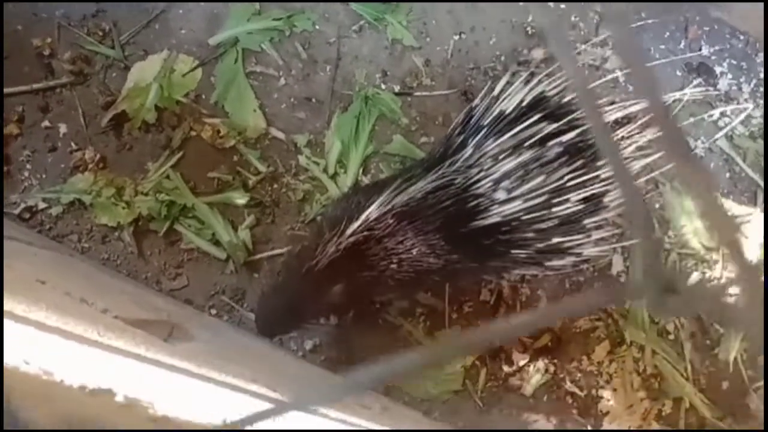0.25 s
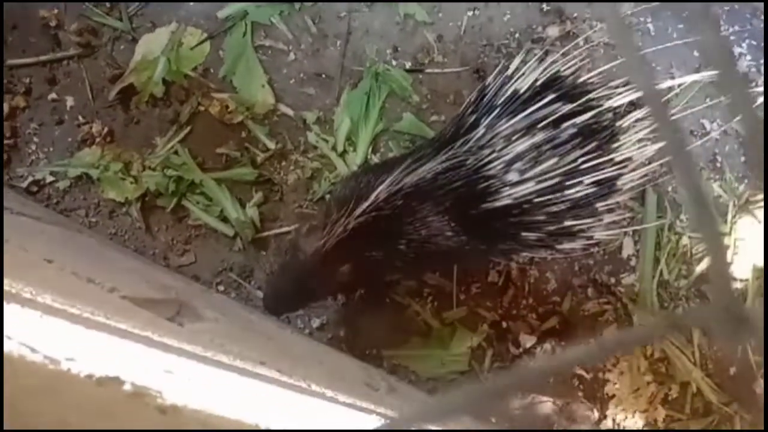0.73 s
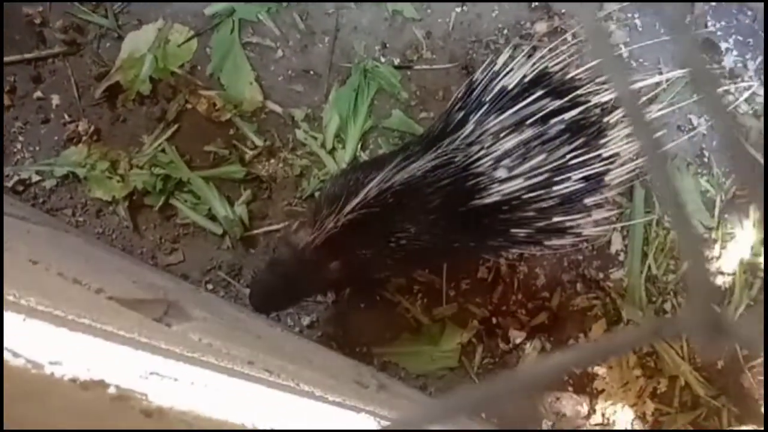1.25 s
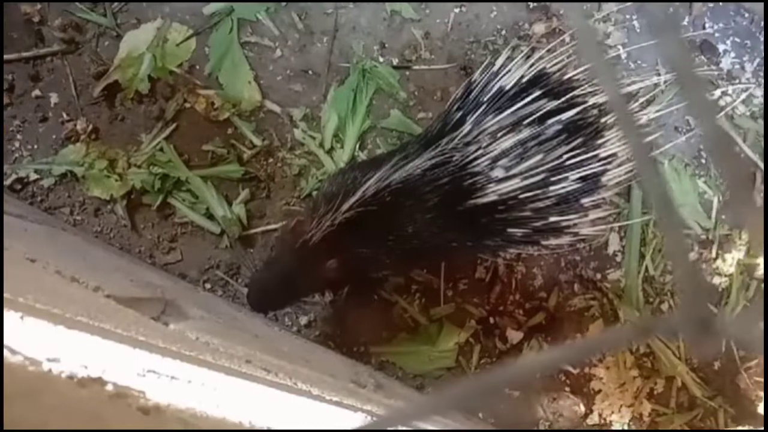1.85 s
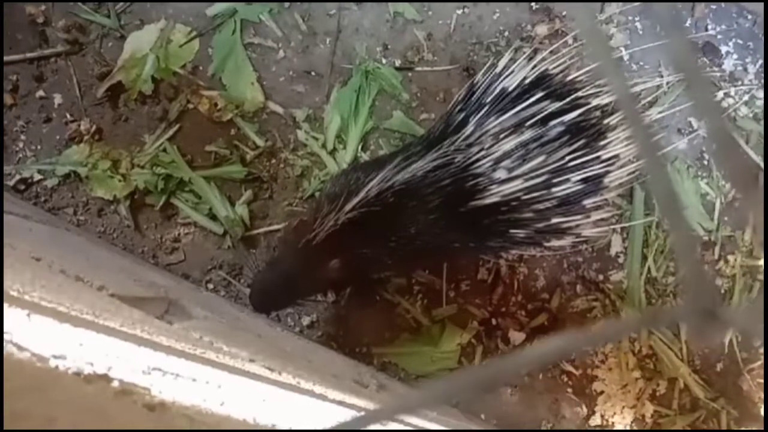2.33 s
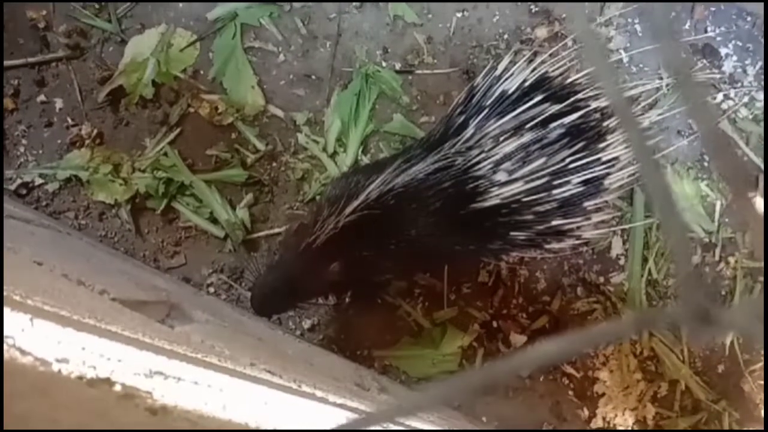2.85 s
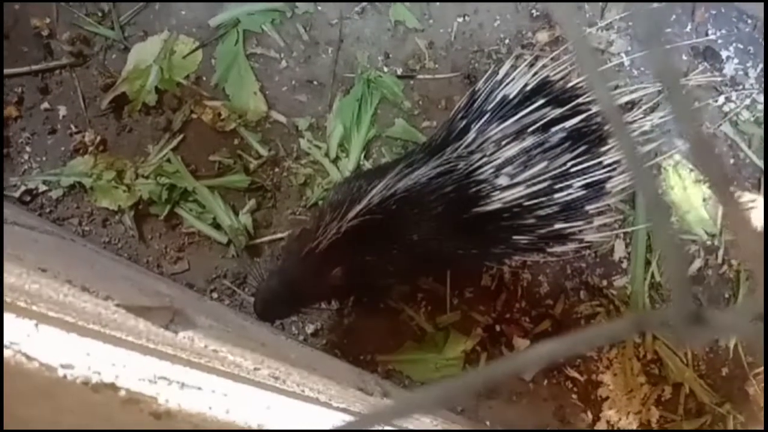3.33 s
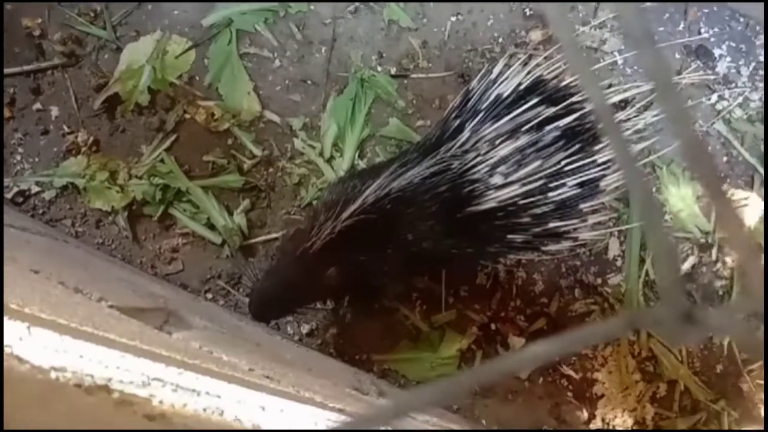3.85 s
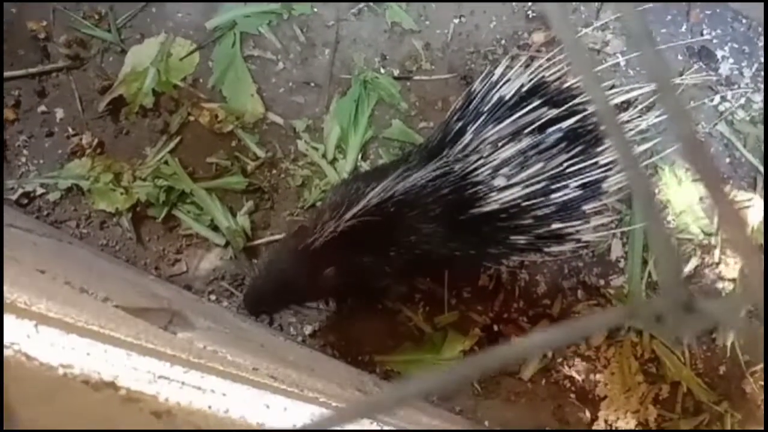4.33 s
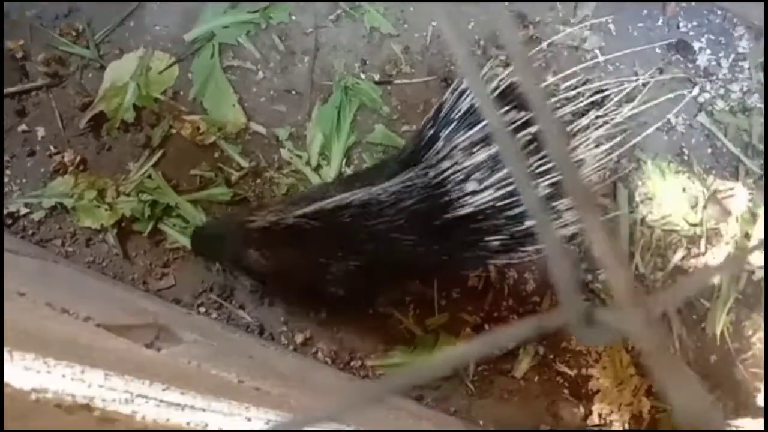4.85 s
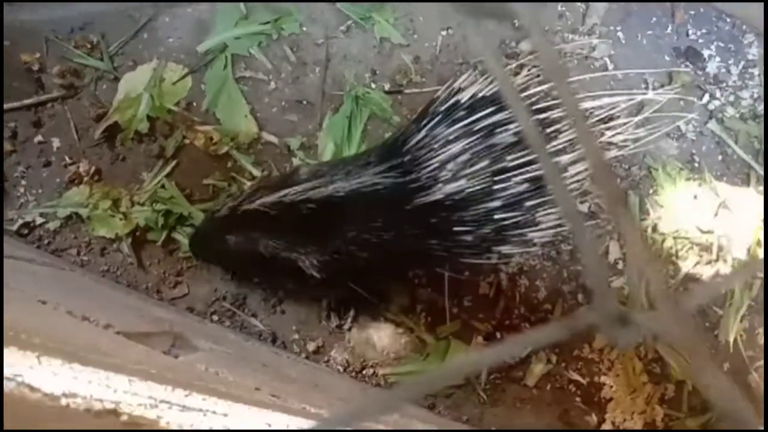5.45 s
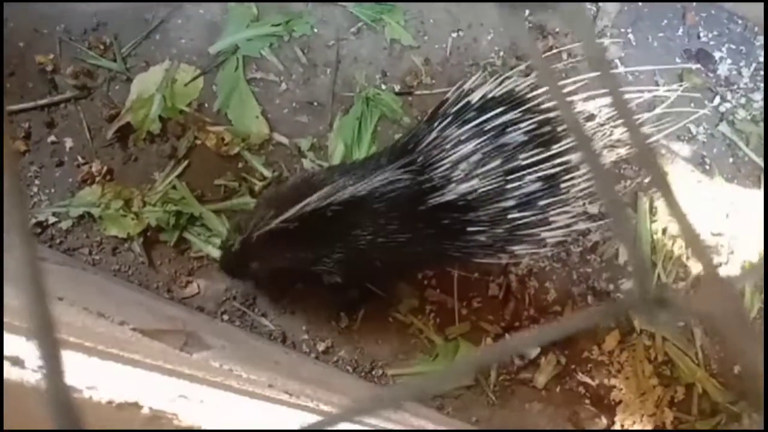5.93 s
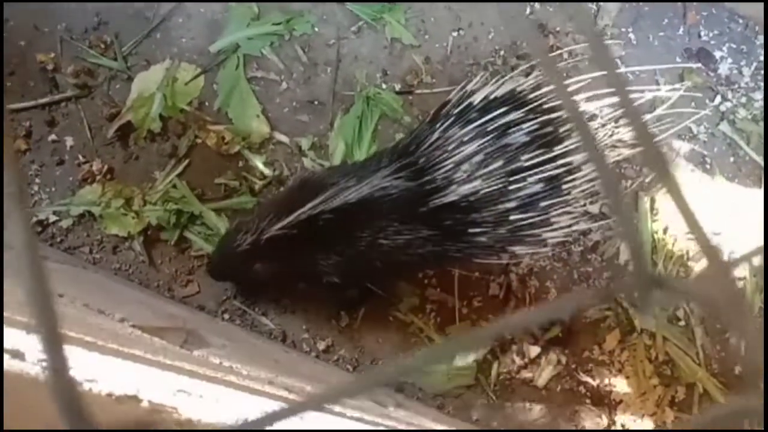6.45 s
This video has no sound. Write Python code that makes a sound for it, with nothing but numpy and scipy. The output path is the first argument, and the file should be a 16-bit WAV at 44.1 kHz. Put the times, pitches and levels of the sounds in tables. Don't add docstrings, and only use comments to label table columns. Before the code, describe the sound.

Outdoor hiss and leaf rustle, one loud hard knock early, then thin metal rattling, two lesser knocks, scuffs, and a distant engine starting late.

```python
import sys
import numpy as np
from scipy import signal
from scipy.fft import rfft, irfft
from scipy.io import wavfile
from scipy.ndimage import uniform_filter1d

SR = 44100
rng = np.random.default_rng(int(sys.argv[2]) if len(sys.argv) > 2 else 0)


def dump_mix(stems):
    frames = np.atleast_2d(stems).T
    limited = np.clip(frames, -1, 1)
    pcm = np.round(limited * 32767).astype(np.int16)
    wavfile.write(sys.argv[1], SR, pcm)


def elevation(decibels):
    levels = np.asarray(decibels, float)
    return 10 ** (levels / 20)


N = 295470
T = np.arange(SR // 3) / SR


def curve(table):
    s, *columns = np.transpose(table)
    return [np.interp(np.arange(N) / SR, s, c) for c in columns]


def unit(x):
    return x / np.sqrt(np.mean(x ** 2))


def band(x, hz, width):
    return signal.lfilter(*signal.iirpeak(hz, hz / width, fs=SR), x)


def colour(x, spectrum):
    hz, db = np.transpose(spectrum)
    f = np.fft.rfftfreq(len(x), 1 / SR) + 1
    gain = elevation(np.interp(np.log(f), np.log(hz), db, left=-90, right=-90))
    return irfft(rfft(x) * gain, len(x))


def walk(rate):
    k = int(SR / rate)
    held = np.repeat(rng.standard_normal(N // k + 1), k)
    return uniform_filter1d(uniform_filter1d(held, k), k)[:N]


def add(out, s, x):
    i = int(s * SR)
    out[i:i + len(x)] += x[:len(out) - i]


def fade(t60, rise):
    return (1 - np.exp(-T / rise)) * 1000. ** (-T / max(t60, 1e-3))


def ring(modes, rise):
    return sum(elevation(db) * fade(t60, rise) * np.sin(2 * np.pi * hz * T) for hz, db, t60 in modes)


def grit(hz, width, rough_db=0.5):
    rough = elevation(rough_db * np.repeat(rng.exponential(size=len(T) // 60 + 1), 60)[:len(T)])
    return unit(band(band(rng.standard_normal(len(T)) * rough, hz, width), hz, 3 * width))


# frequency in Hz, density in dB per Hz.
AIR_BASS = [(12, -59), (20, -41), (27, -20), (76, 3.5), (107, -3.5), (143, -1.5), (241, -7.5), (438, -7.5),
            (557, -10), (1030, -15), (1240, -6.5), (1390, -11), (1700, -12), (2210, -44), (3740, -120)]
AIR_TREBLE = [(1000, -49), (1700, -27), (1800, -11), (2850, -6.5), (3670, -11), (4380, -17.5), (5760, 0.5),
              (6200, -9.5), (7210, -3.5), (8140, -22), (9370, -13), (11300, -18), (13500, -24.5),
              (14800, -21.5), (16000, -21)]
# frequency in Hz, width in Hz, level in dB.
RUSTLE = [(1910, 120, 0), (2120, 125, 1.5), (2355, 36, 2.5), (2620, 185, 3), (2880, 200, 1.5),
          (3570, 170, -7.5)]
# time in seconds, level above rest in dB.
STIR = [(0.0, -7.5), (0.24, 6.5), (0.43, 0), (0.54, 7.5), (0.72, 1), (1.08, -2.5), (1.53, 2.5), (1.73, -2),
        (1.94, 4.5), (2.2, -1), (2.5, 5), (2.76, -2.5), (3.71, -4), (3.86, 3.5), (4.2, 0), (4.87, 4.5),
        (5.09, -1), (5.6, -0.5), (6.3, 1.5), (6.7, 3.5)]
# time in seconds, level in dB.
TRAFFIC = [(0.0, -72), (0.17, -73.5), (0.41, -69), (0.82, -72), (1.52, -70.5), (1.8, -71), (2.1, -67.5),
           (2.75, -72), (3.68, -70.5), (4.06, -68.5), (4.96, -71), (5.25, -70.5)]
BASS_DB, TREBLE_DB, RUSTLE_DB, RUMBLE_DB = -65.5, -54.5, -65.5, 3
BASS_PER_STIR, TREBLE_PER_STIR, RUSTLE_PER_STIR = 0.29, 0.26, 1.43
TREBLE_SAG_DB_PER_S, TREBLE_GUST_DB = -0.775, 0.8
FENCE_HUM_S, FENCE_HUM_DB, FENCE_HUM_FADE_S = 0.49, 6, 0.78
ENGINE_RUMBLE_DB = 6.5
CASING_NOTE_HZ, CASING_NOTE_WIDTH_HZ, CASING_NOTE_DB = 1270, 23, -71
NOTE_FLUTTER_DB, NOTE_FLUTTER_HZ = 4, 45


def air():
    t, stir = np.arange(N) / SR, curve(STIR)[0]
    hum_db = FENCE_HUM_DB * np.exp(-np.abs(t - FENCE_HUM_S) / FENCE_HUM_FADE_S) * (t > FENCE_HUM_S)
    bass_db = BASS_DB + BASS_PER_STIR * stir + hum_db
    treble_db = TREBLE_DB + TREBLE_PER_STIR * stir + TREBLE_SAG_DB_PER_S * t + TREBLE_GUST_DB * walk(6.7)
    rumble_db = RUMBLE_DB + curve(TRAFFIC)[0] + ENGINE_RUMBLE_DB * (t > FIRING[0][0])

    low = [elevation(4.7 * walk(12)) * band(rng.standard_normal(N), hz, 0.55 * hz)
           for hz in (40, 70, 115, 190, 310, 480, 720, 1000, 1260, 1550)]
    rumble = unit(colour(sum(low[:4]), AIR_BASS))
    bass = unit(colour(sum(low[4:]), AIR_BASS))
    high = [elevation(4.47 * walk(24)) * unit(band(rng.standard_normal(N), hz, 570))
            for hz in range(1600, 16000, 600)]
    treble = unit(colour(sum(high), AIR_TREBLE))

    grains = rng.standard_normal(N) * elevation(1.2 * uniform_filter1d(rng.exponential(size=N), size=40))
    leaves = unit(sum(elevation(db + 6.2 * walk(30)) * unit(band(band(grains, hz, w), hz, 2 * w))
                      for hz, w, db in RUSTLE))
    note = unit(band(band(grains, CASING_NOTE_HZ, CASING_NOTE_WIDTH_HZ), CASING_NOTE_HZ, 110))
    note_db = CASING_NOTE_DB + stir + NOTE_FLUTTER_DB * walk(NOTE_FLUTTER_HZ)

    hiss = elevation(bass_db) * bass + elevation(treble_db) * treble + elevation(note_db) * note
    return hiss + elevation(rumble_db) * rumble + elevation(RUSTLE_DB + RUSTLE_PER_STIR * stir) * leaves


# start in seconds, length in seconds, note in Hz, level in dB.
SCRAPES = [(0.185, 0.082, 281, -52.5), (0.29, .08, 115, -58), (0.49, 0.093, 301, -52),
           (0.52, .13, 2450, -60), (0.56, 0.058, 3000, -62), (0.629, 0.28, 1277, -62),
           (2.309, .26, 2120, -61), (2.424, 0.14, 2970, -61), (2.497, .06, 3500, -64),
           (2.898, .11, 3700, -67), (3.093, .06, 2700, -60.5), (3.271, 0.064, 3100, -63),
           (3.28, 0.085, 2150, -65), (4.15, 0.081, 2150, -61), (4.21, .04, 1260, -59),
           (4.236, .06, 2600, -58.5), (4.531, .05, 3200, -63), (4.7, .06, 1920, -61),
           (4.791, .09, 3300, -65), (4.801, .06, 2330, -62), (5.02, 0.031, 2450, -56),
           (5.128, .06, 621, -65.5), (5.36, .08, 2500, -67), (5.382, 0.095, 2850, -62),
           (5.74, 0.04, 2900, -62), (6.075, 0.082, 2950, -68), (6.183, 0.15, 1900, -64),
           (6.2, .06, 2300, -67), (6.277, .11, 2970, -62), (6.287, .09, 2350, -64),
           (6.297, 0.054, 2640, -64), (6.56, .07, 2800, -64), (6.577, 0.046, 1950, -62)]
SCRAPE_WIDTH = 0.053


def scrapes():
    out = np.zeros(N)
    for s, length, hz, db in SCRAPES:
        n = min(int(length * SR), len(T))
        add(out, s, elevation(db) * np.sqrt(np.hanning(n)) * grit(hz, SCRAPE_WIDTH * hz)[-n:])
    return out


SCUFF_TOP_HZ = 3800


def shade(x):
    return signal.sosfilt(signal.butter(4, SCUFF_TOP_HZ, fs=SR, output="sos"), x)


# start in seconds, peak in dB, low note in Hz, high note in Hz,
# high note above low in dB.
TAPS = [(0.196, -37, 1594, 2950, -0.5), (0.7173, -54, 1280, 3570, 6), (0.836, -40.5, 1350, 2370, -10),
        (1.054, -45.5, 1350, 2670, 2.5), (1.351, -45.5, 1350, 1860, 4.5), (2.0674, -50, 1830, 2230, 7),
        (2.072, -46, 1180, 2250, -2), (2.299, -42.5, 1280, 2400, -23), (3.36, -48, 1260, 2490, -10),
        (4.399, -44, 1330, 1720, -1), (4.931, -40.5, 1460, 2010, -2), (5.021, -38, 1360, 2430, -13),
        (5.1922, -52, 1600, 3170, 3)]
# start in seconds, peak in dB, leaf note in Hz, leaf note above the
# casing note in dB, t60 in seconds.
SCUFFS = [(0.2732, -43.5, 2230, 8.5, 0.15), (0.302, -54.5, 2210, 18.5, 0.092),
          (0.528, -33, 2420, -20, 0.11), (0.721, -54, 2300, 1, 0.51), (0.826, -46, 2500, -2.5, 0.3),
          (0.86, -50, 1900, -15, 0.27), (1.017, -47.5, 2620, 7, 0.19), (1.679, -42, 2900, -5, 0.16),
          (2.1341, -43.5, 3280, -12, 0.29), (2.16, -39.5, 2490, -8, 0.23), (2.4094, -56, 2290, -10, 0.29),
          (2.4796, -56, 2150, 6, 0.3), (2.601, -45.5, 2700, 2.5, 0.22), (3.7287, -64, 2150, 12, 0.84),
          (3.95, -63.5, 2360, 14, 0.34), (4.1791, -57, 2120, 3, 0.81), (4.307, -63.5, 2120, 19, 0.21),
          (4.385, -50, 1750, 3, 0.16), (4.615, -53, 1900, 7.5, 0.17), (4.732, -57, 1910, 7, 0.14),
          (5.058, -50, 2400, -12, 0.11), (5.082, -47, 2400, -12, 0.083), (5.193, -50, 3450, 6, 0.15),
          (6.002, -43, 1860, -16, 0.19)]
CHATTER = [(0.1979, -36, 1600, 3210, 2.5), (0.229, -45, 1266, 2750, 4), (0.846, -57, 1430, 2340, -4),
           (1.055, -46, 1250, 2680, 5), (1.063, -45, 1540, 3100, 2), (1.3518, -42, 1850, 2270, -6),
           (1.3565, -45, 1900, 2250, -1), (1.367, -45, 1480, 2000, -1), (2.0679, -45, 1920, 2500, -1),
           (2.0733, -44, 1820, 2410, 5), (4.3998, -41.5, 1374, 1750, -2), (4.414, -47, 1340, 1690, -7),
           (4.616, -51, 1730, 2400, -3), (4.628, -46, 2060, 3100, -3), (4.9346, -44.5, 1540, 2340, 6),
           (4.9403, -44.5, 1470, 2060, 0), (4.9458, -44, 1490, 2460, -3), (4.958, -46, 1290, 2430, -1),
           (5.027, -42, 1376, 2420, -8), (5.0395, -41, 1380, 2530, -9), (5.1925, -55, 1540, 3000, 3),
           (5.2003, -49, 1480, 2840, 3.5), (5.2125, -53, 1350, 3220, 2)]
SCUFF_HZ = 1260
TAP_T60_S, CHATTER_T60_S = 0.16, 0.053


def scuffs():
    out = np.zeros(N)
    taps = [(*row, TAP_T60_S) for row in TAPS]
    steps = [(s, db, SCUFF_HZ, hz, note_db, t60) for s, db, hz, note_db, t60 in SCUFFS]
    chatter = [(*row, CHATTER_T60_S) for row in CHATTER]
    for table, rise, strike in ((taps, 0.002, 0.8), (steps, 0.01, 0), (chatter, 0.0009, 2.5)):
        for s, db, low_hz, high_hz, high_db, t60 in table:
            low = grit(low_hz, 0.09 * low_hz)
            high = grit(high_hz, 0.086 * high_hz) + 0.7 * grit(high_hz, 0.2 * high_hz)
            notes = low + elevation(high_db) * high
            struck = strike * ring([(low_hz, 0, 0.03), (high_hz, high_db, 0.02)], rise)
            add(out, s - rise / 2, elevation(db - 5.5) * (notes * fade(t60, rise) + struck))
    return shade(out)


# start in seconds, peak in dB, note in Hz, t60 in seconds.
THUMPS = [(0.198, -47.5, 270, 0.35), (0.29, -51, 410, 0.17), (0.297, -54, 120, 0.26), (0.4, -65, 430, 0.35),
          (0.488, -42, 328, 0.12), (0.503, -44, 1290, 0.1), (0.505, -44, 250, 0.12),
          (0.531, -46.5, 470, 0.59), (0.55, -51, 81, 0.39), (0.555, -41.5, 357, 0.22), (0.6, -56, 575, 0.2),
          (0.8, -51, 260, 0.17), (0.749, -52, 662, 0.32), (0.758, -53, 390, 0.27), (0.8, -52.5, 377, 0.55),
          (0.84, -45, 640, 0.26), (0.869, -43.5, 502, 0.19), (1.03, -50, 114, 0.15),
          (1.032, -49.5, 230, 0.12), (1.04, -50.5, 483, 0.2), (1.292, -49.5, 192, 0.12),
          (1.295, -53, 138, 0.2), (1.93, -55, 95, 0.38), (1.952, -59, 535, 0.53), (2.145, -52, 600, 0.2),
          (2.166, -40, 780, 0.14), (2.191, -48.5, 814, 0.39), (3.675, -40, 59.4, 0.2),
          (3.699, -55, 130, 0.089), (3.867, -54, 167, 0.23), (4.079, -51, 130, 0.16), (4.21, -50, 126, 0.2),
          (4.379, -51, 89, 0.17), (4.62, -56, 430, 0.27), (4.668, -51.5, 147, 0.23),
          (4.919, -56.5, 320, 0.33), (5.01, -56, 603, 0.13), (5.04, -57, 325, 0.32),
          (5.192, -47.5, 265, 0.24)]


def thumps():
    out = np.zeros(N)
    for s, db, hz, t60 in THUMPS:
        rough = grit(hz, 0.36 * hz) * fade(t60, 0.0062)
        struck = 1.2 * ring([(hz, 0, 0.7 * t60)], 0.0023)
        add(out, max(s - 0.003, 0), elevation(db - 5.0) * (rough + struck))
    return shade(out)


# start in seconds, peak in dB, ring under the hiss in dB, t60 in seconds,
# strike above the hiss in dB.
TICKS = [(0.278, -41, -26, 0.46, -14), (0.784, -44, -30, 0.26, -6), (1.3502, -44, -23, 0.16, 4),
         (1.3844, -41, -30, 0.052, 0), (1.4241, -42.5, -35, 0.13, -5), (1.446, -37.5, -28, 0.07, 3),
         (1.454, -40.5, -12, 0.11, -1), (1.474, -44, -11, 0.061, 1), (1.5387, -36, -26, 0.075, -4),
         (1.543, -43, -26, 0.06, 3), (1.5596, -41.5, -14, 0.049, 7), (1.6614, -40, -12, 0.15, 7.5),
         (1.758, -43, -20, 0.11, 2), (1.8615, -38, -20, 0.17, 2), (1.895, -39.5, -12, 0.14, 7),
         (1.925, -39.5, -24, 0.1, 3), (1.949, -38, -14, 0.19, 3), (1.9843, -38, -12.5, 0.16, 3.5),
         (2.045, -47, -29, 0.1, -2), (3.231, -49.5, -28, 0.11, -3), (4.3944, -41, -11, 0.24, -9),
         (4.918, -49, -32, 0.37, -15), (5.359, -47.5, -30, 0.71, -7), (6.3896, -49, -25, 0.19, -3)]
# frequency in Hz, level in dB,
# t60 in seconds.
METAL = [(2930, 3, .06), (3500, 1, .04), (2400, -4, .03)]
JINGLE = [(5150, -3.5, 0.18), (5300, -18, 0.032), (5830, 4, 0.042), (6570, 5, 0.026), (9080, -8, 0.1),
          (10350, -14, 0.024), (10940, -8, 0.046)]
STRIKE = [(3100, 1, 0.0076), (5400, -9, 0.0065), (6840, 0, 0.0066), (8850, -15, 0.0026),
          (10400, 0.5, 0.0054), (12600, -12, .004)]
STRIKE_T60_S, TAIL_RISE_S = 0.013, 0.003
SIZZLE_DB = -13.5


def detuned(modes):
    return [(hz * (1 + 0.0166 * rng.standard_normal()), db + 0.86 * rng.standard_normal(), t60)
            for hz, db, t60 in modes]


def ticks():
    out = np.zeros(N)
    for s, db, ring_db, t60, strike_db in TICKS:
        hiss = unit(colour(grit(5000, 7200, rough_db=2.0), AIR_TREBLE))
        low, high, first = detuned(METAL), detuned(JINGLE), detuned(STRIKE)
        rings = elevation(ring_db + 11.0) * ring(low, 0.0033) + elevation(0.18 * strike_db - 2.0) * ring(high, 0.00056)
        edge = hiss * fade(STRIKE_T60_S, 0.00024) + elevation(-1.0) * ring(first, 0.0001)
        tail = (hiss + elevation(SIZZLE_DB) * grit(10000, 3500)) * fade(t60, TAIL_RISE_S)
        add(out, s, elevation(db - 6.0) * (elevation(strike_db) * edge + tail + rings))
    return out


# start in seconds, thud in Hz, thud in dB, casing or fence
# ring in dB, crack in dB.
BLOWS = [
    (0.47554, 223, -5.5, -6, 6),
         (0.47485, 900, -44, -60, -20), (0.479, 93, -29, -70, -70), (0.4995, 298, -27, -42, -45),
          (0.5133, 200, -24.5, -49, -55), (0.53, 183, -43, -53, -55), (.545, 112, -39, -64, -70),
          (3.666, 162, -46, -74, -70), (3.6841, 350, -24, -26.5, -10), (3.6862, 136, -29.5, -68, -70),
          (3.9302, 87.4, -28.5, -76, -62), (3.932, 230, -27, -46, -53), (6.2772, 690, -24.5, -55, -16.5),
          (6.2785, 370, -39, -56, -70), (6.2823, 130, -33, -68, -66)]
# frequency in Hz, level in dB, t60 in seconds.
FENCE = [(1282, -25, .075), (961, -3, .008), (1791, 0, .005), (2906, -18, .0087), (3723, -15, .0043),
         (1287, 0, .0067), (3400, -27, .025)]
CASING = [(1260, 4.5, 0.025), (790, -2, 0.0068), (1030, 4, 0.008), (2210, 5.5, 0.006), (2650, 9, 0.0039),
          (3030, -11, 0.0066)]
# frequency in Hz, level in dB.
SNAP = [(2000, -14), (3200, -3), (3850, -24), (5700, -3), (8000, -13), (10500, -8), (14000, -19),
        (16500, -18)]
SNAP_S, SNAP_DB = 3.6843, -34
FENCE_UNTIL_S = 1
THUD_CYCLES, LOOSE_BELOW_DB, LOOSE_CYCLES_PER_DB = 5.9, -48, 0.3
KNOCK_TOP_HZ = 3700


def knocks():
    out = np.zeros(N)
    for s, hz, thud_db, ring_db, crack_db in BLOWS:
        t60 = (THUD_CYCLES + LOOSE_CYCLES_PER_DB * max(LOOSE_BELOW_DB - thud_db, 0)) / hz
        crack = -np.sin(2 * np.pi * 1500 * T) * fade(0.0013, 0.0002)
        turns = hz * T + 0.78 * (1 - np.exp(-hz * T / 0.25))
        thud = fade(t60, 0.0011) * np.sin(2 * np.pi * turns)
        thud += elevation(-34) * grit(530, 1200) * fade(9 * t60, 0.0027)
        body = ring(FENCE if s < FENCE_UNTIL_S else CASING, 0.00026)
        add(out, s, elevation(crack_db) * crack + elevation(ring_db) * body + elevation(thud_db) * thud)
    out = signal.sosfilt(signal.butter(6, KNOCK_TOP_HZ, fs=SR, output="sos"), out)
    edge = np.zeros(N)
    add(edge, SNAP_S - 0.0002, rng.standard_normal(len(T)) * fade(0.007, 0.0004))
    edge = colour(edge, SNAP)
    return out + elevation(SNAP_DB) * edge / edge.max()


# start in seconds, length in seconds, first pitch in Hz, level in dB.
COOS = [(1.101, 0.15, 1760, -67.5), (1.16, 0.1, 514, -72), (1.3, 0.23, 755, -64.5), (1.34, 0.063, 500, -69),
        (1.518, 0.23, 761, -69), (2.352, 0.13, 395, -71), (2.507, 0.081, 403, -70), (2.883, 0.12, 452, -70),
        (3.421, 0.1, 512, -70), (3.71, 0.062, 500, -67.5), (4.07, 0.15, 514, -67),
        (4.958, 0.15, 697, -66.5), (5.149, 0.24, 618, -78), (5.95, 0.1, 510, -76), (6.0, 0.1, 776, -76)]
COO_SAG = 0.027


def coos():
    out = np.zeros(N)
    for s, length, hz, db in COOS:
        n = int(length * SR)
        waver = 1 + 0.023 * unit(band(rng.standard_normal(n), 25.0, 26))
        phase = 2 * np.pi * np.cumsum(hz * np.linspace(1, 1 - COO_SAG, n) * waver) / SR
        blur = 1 + 0.51 * unit(band(rng.standard_normal(n), 13.0, 32))
        add(out, s, elevation(db + 8.5) * np.sqrt(np.hanning(n)) * blur * np.sin(phase))
    return out


# time in seconds, firings per second.
FIRING = [
    (5.25, 14.55),
    (6.22, 14.55),
    (6.3, 15.5),
    (6.42, 16.5),
    (6.55, 17.2),
    (6.7, 17.4),
]
# time in seconds, boom in dB, bark above the boom in dB.
ENGINE = [(5.27, -70, 0), (5.32, -58.5, -5.5), (5.47, -54, -4), (5.55, -49, -5.5), (5.62, -56.5, 1),
          (5.75, -50.5, -6.5), (5.83, -59, 3.5), (5.9, -53.5, 0), (6.1, -53, -3), (6.24, -51.5, -3.5),
          (6.31, -48.5, -5.5), (6.38, -44, -11), (6.44, -44.5, -6), (6.55, -44.5, -6.5), (6.63, -46, -4),
          (6.7, -46.5, -1)]
# frequency in Hz, width in Hz, level in dB,
# lag in seconds.
BOOM = [(120, 11.4, -1, 0.0053), (104, 30, -1, 0.0028), (73.6, 23, -10, 0.0016)]
MIDDLE = [(179, 23, 6.5, 0.0067), (216, 11, -4, 0.0108), (234, 12, -8, 0.0101)]
BARK = [(277, 60, 5.9, 0.00388), (299.5, 32, 4, 0.01142)]
RASP = [(410, 25, 2, 0.012), (449, 48, -9, 0.022), (345, 42, -7, 0.0172)]
MIDDLE_DB = -5.5
RASP_DB, RASP_PER_BOOM, IDLE_BOOM_DB = -21.5, 0.37, -52
FIRING_JITTER_S = 0.0005


def exhaust(x, hz, width):
    return band(band(band(x, hz, width), hz, 1.95 * width), hz, 3.1 * width)


def engine():
    running = np.arange(N) >= FIRING[0][0] * SR
    cycles = np.cumsum(curve(FIRING)[0] * running) / SR
    fired = np.flatnonzero(np.diff(np.floor(cycles)))
    boom_db, bark_db = curve(ENGINE)
    rasp_db = RASP_DB + RASP_PER_BOOM * (boom_db - IDLE_BOOM_DB)
    out = np.zeros(N)
    # modes, dB above the boom, share of gas noise
    for modes, db, gas in ((BOOM, 0, 0.003), (MIDDLE, MIDDLE_DB, 0.004),
                           (BARK, bark_db, 0.004), (RASP, rasp_db, 0.02)):
        size, late = rng.standard_normal((2, 64))[:, :len(fired)]
        flow = gas * rng.standard_normal(N) * np.exp(-(cycles % 1) / 0.4) * (cycles > 1)
        puffs = np.minimum(fired + (FIRING_JITTER_S * SR * late).astype(int), N - 1)
        flow[puffs] += elevation(0.5 * size)
        part = sum(elevation(d) / w * exhaust(np.roll(flow, int(lag * SR)), hz, w) for hz, w, d, lag in modes)
        out += elevation(boom_db + db) * part / part[-SR:].std()
    return out


def scene():
    far = air()
    near = engine() + coos() + knocks() + ticks() + scuffs() + thumps() + scrapes()
    mono = far + signal.sosfilt(signal.butter(3, 70, "high", fs=SR, output="sos"), near)
    return np.array([mono, mono])


def band_limit(x):
    return signal.sosfilt(signal.butter(12, 16750, fs=SR, output="sos"), x)


# frequency in Hz, level in dB.
SIDE_COLOUR = [(20, -12), (110, -5.5), (300, 2), (700, 5), (1300, 7.5), (2400, -2), (4400, -6),
               (8000, -17.5), (15000, 5), (17000, 2)]
SIDE_BASS_DB, SIDE_TREBLE_DB = -84.5, -78.5


def record(dry):
    bass = elevation(SIDE_BASS_DB) * unit(colour(rng.standard_normal(N), AIR_BASS))
    treble = elevation(SIDE_TREBLE_DB) * unit(colour(rng.standard_normal(N), AIR_TREBLE))
    side = colour(bass + treble, SIDE_COLOUR)
    top_cut = signal.ellip(8, 0.2, 30, 15500, fs=SR, output="sos")
    mix = signal.sosfilt(top_cut, dry + np.array([side, -side]))
    return band_limit(mix)


dry = scene()
out = record(dry)
dump_mix(out)
```